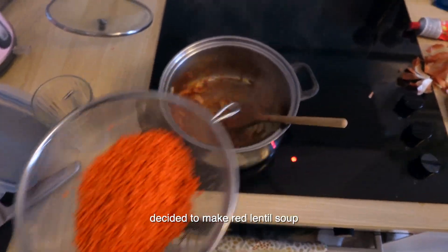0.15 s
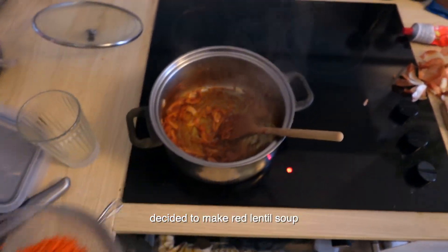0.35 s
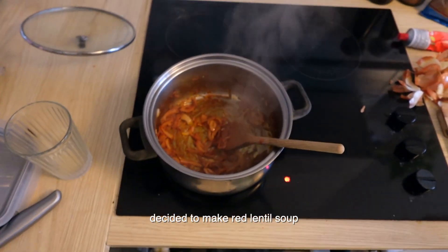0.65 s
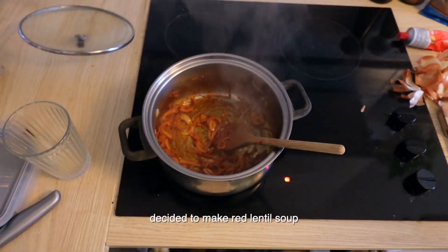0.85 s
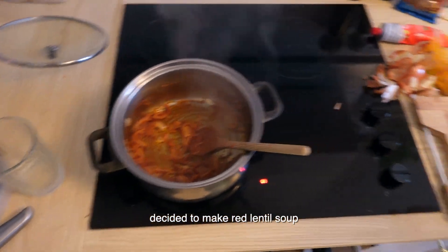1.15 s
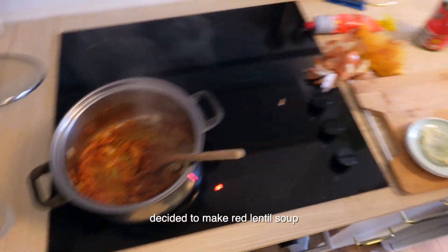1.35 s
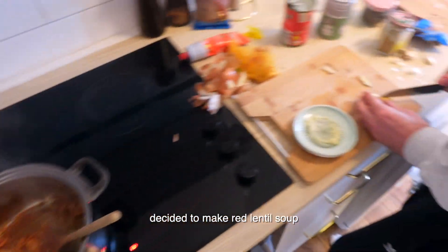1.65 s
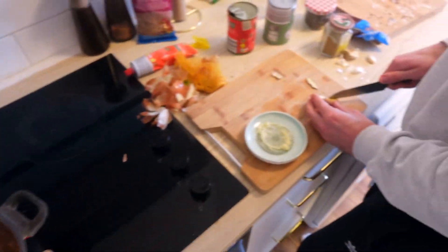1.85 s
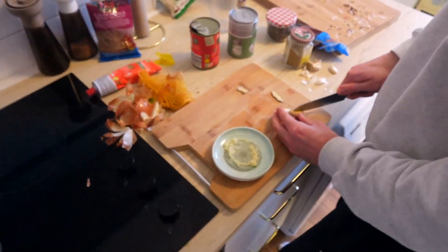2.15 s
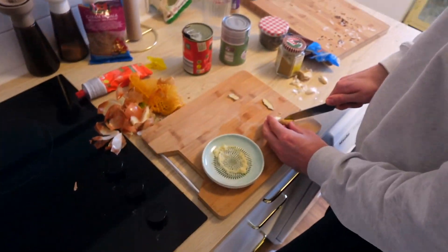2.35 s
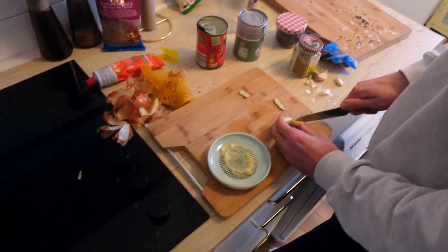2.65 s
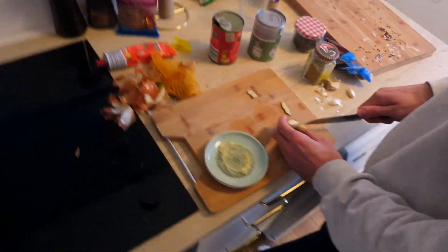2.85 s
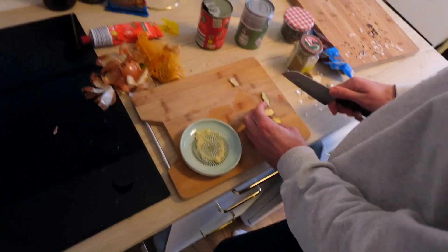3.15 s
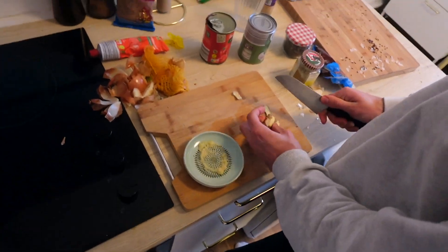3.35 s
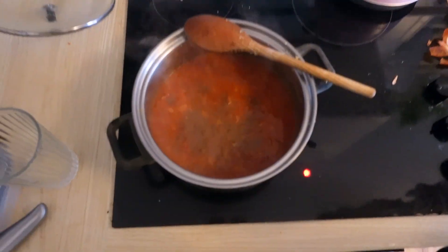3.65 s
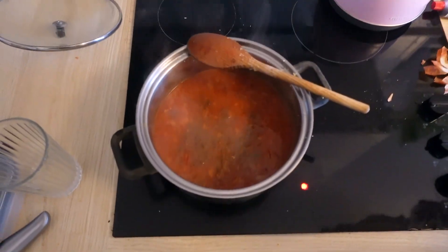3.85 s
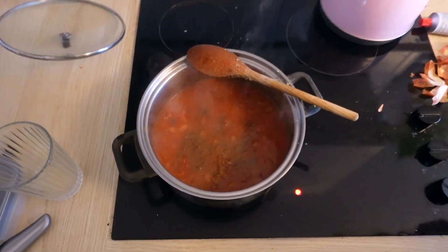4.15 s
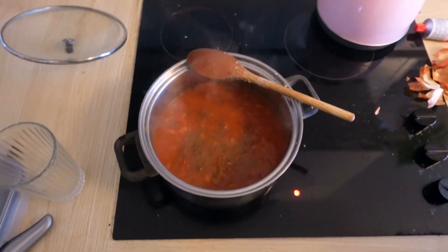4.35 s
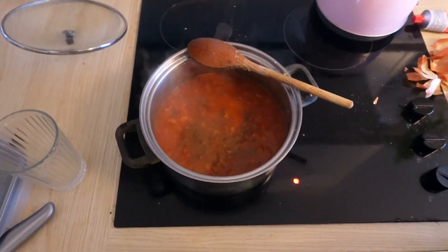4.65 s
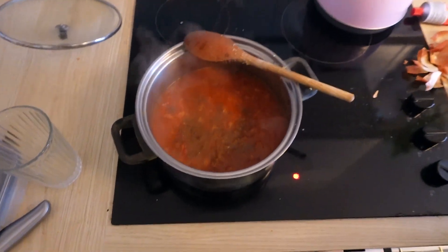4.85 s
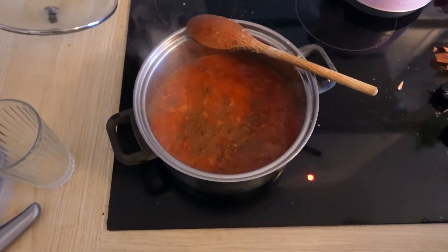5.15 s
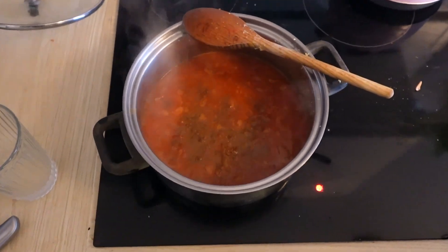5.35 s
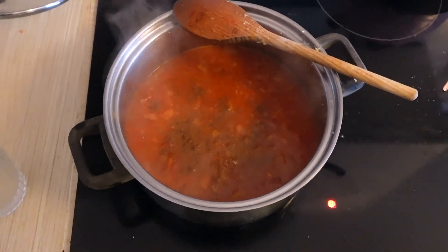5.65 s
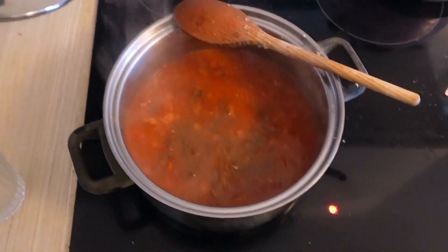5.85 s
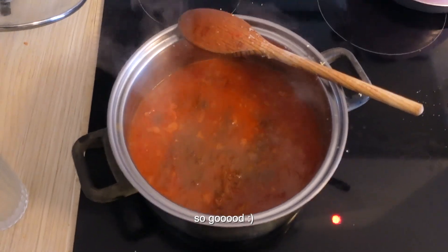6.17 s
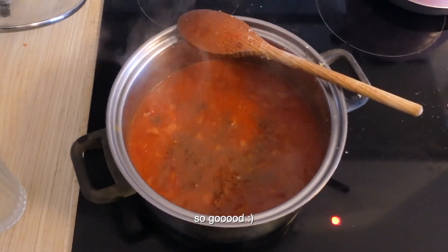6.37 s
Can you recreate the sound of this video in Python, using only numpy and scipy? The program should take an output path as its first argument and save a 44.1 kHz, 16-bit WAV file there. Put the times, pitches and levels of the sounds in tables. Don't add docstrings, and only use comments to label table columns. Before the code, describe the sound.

Bright sizzling in a hot pot, lentils rustle and rattle down with a hard metal knock, knife ticks, then thick soup bubbling and spluttering.

```python
import sys
import numpy as np
from scipy import signal
from scipy.fft import rfft, irfft, next_fast_len
from scipy.io import wavfile
from scipy.ndimage import uniform_filter1d

SR = 44100
rng = np.random.default_rng(int(sys.argv[2]) if len(sys.argv) > 2 else 0)


def log_audio(samples):
    frames = np.atleast_2d(samples).T
    limited = np.clip(frames, -1, 1)
    pcm = np.round(limited * 32767).astype(np.int16)
    wavfile.write(sys.argv[1], SR, pcm)


def boost(x):
    u = np.asarray(x, float) / 20
    return 10 ** u


N = 287091

CUT_S, BACK_S, FADE_S = 3.566, 3.632, .26

# (time [s], level [dB])
FRY_NEARNESS = [(0, -36.5), (.4, -37.5), (.75, -35), (1.3, -36.5), (1.5, -37.5), (1.88, -40), (1.97, -36.5),
                (2.06, -37.5), (2.17, -41), (3.56, -41)]
# (frequency [Hz], level [dB per Hz])
FIZZ_TONE = [(1470, -34), (2500, -6.5), (2880, -3.5), (3270, -3.5), (6150, -0.5), (11700, -5.5),
             (15100, -6.5), (16100, -9.5), (16500, -10.5)]
# (frequency [Hz], level [dB per Hz])
FRY_BODY_TONE = [(180, -59.5), (300, -26.5), (637, -10.5), (700, -9.5), (1860, -3), (2120, -3.5),
                 (2880, -5), (5000, -10.5), (6500, -50), (11000, -120)]
# (time [s], peak level [dB], pitch [Hz])
FAT_SPITS = [(0.536, -19, 9600), (.654, -21, 6400), (0.7226, -24, 6500), (0.84, -18, 5440),
             (1.017, -20, 6900), (1.664, -23.5, 8800), (2.1244, -17.5, 7650), (2.348, -27, 11000)]
# (middle time [s], spread [s], level [dB])
FRY_FLARES = [
    (1.2, 0.1, -10),
    (1.98, 0.075, 7.5),
    (3.0, .2, 1),
]
FRY_MEAN_DB = -38.5

# (frequency [Hz], level [dB per Hz])
DRONE_TONE = [(30, -12), (90, -46), (150, -48.5), (200, -33.5), (320, -21.5), (450, -18), (520, -23.5),
              (620, -16.5), (700, -9), (900, -22), (1170, -35), (2000, -76)]
# (before the scene changes [dB], after it [dB])
DRONE_LEVELS = (-59.5, -53.5)
# (pitch [Hz], level after the change [dB], wander [Hz], level before it [dB relative], flutter [dB])
HOB_HUM = [(375, -54.5, 2.2, -13, 1.8), (198, -77.5, 30, 2, 3), (102, -90, 11, -1.1, 7),
           (777, -65.5, 12.2, -0.5, 5)]

# (time [s], peak level [dB], pitch [Hz], 60 dB decay [s])
KNIFE_TICKS = [(.9762, -23.5, 4800, 0.015), (1.7593, -18, 5000, 0.0073), (1.7594, -20, 2800, 0.0038),
               (1.921, -25, 4000, .005), (1.976, -31, 2860, 0.019), (2.0987, -33, 2400, 0.011),
               (2.1243, -20, 4100, 0.0079), (2.1243, -28, 1880, 0.016), (2.1345, -20, 2340, 0.019),
               (2.1805, -32, 2360, 0.011), (2.1915, -28.5, 2430, 0.013), (2.1916, -28, 4000, .006),
               (2.8312, -33, 2370, 0.031), (3.1366, -34.5, 2220, 0.023), (3.3148, -19.5, 2100, 0.014),
               (3.3768, -27.5, 2190, 0.023), (3.4196, -31, 2460, 0.012), (3.4516, -38, 2150, .013)]
# (time [s], peak level [dB], pitch [Hz], 60 dB decay [s])
BOARD_BUMPS = [(.009, -49, 194, 0.27), (.02, -49.5, 114.5, 0.6), (.337, -49.5, 331, 0.18),
               (.337, -46, 560, 0.05), (1.758, -45, 412, 0.039), (2.124, -26.5, 770, 0.017),
               (2.124, -32, 1210, 0.013), (2.127, -35.5, 490, 0.046), (2.805, -44, 620, 0.13),
               (2.829, -48.5, 340, 0.13), (3.028, -41, 446, 0.045), (3.136, -45, 325, 0.045),
               (3.14, -43.5, 504, 0.054)]
# (middle time [s], spread [s], level [dB])
BLADE_SCRAPES = [
    (3.05, 0.055, -44),
    (3.185, .04, -44.5),
    (3.455, 0.036, -41.5),
    (3.531, 0.062, -64),
]

# (time [s], level [dB])
SIEVE_RUSTLE = [(.3, -47), (.5, -39.5), (.72, -34), (.88, -36), (1.1, -37.5), (1.28, -43), (1.45, -39),
                (1.6, -85)]
# (frequency [Hz], width [Hz], level [dB])
MESH_WIRES = [(4030, 430, -2), (5000, 560, 2.5), (6520, 540, 5.5), (7100, 300, -6.5), (7640, 1200, -6)]
# (time [s], peak level [dB])
RIM_KNOCKS = [
    (1.033, -9.5),
    (1.0349, -8),
    (1.037, -19),
]
# (frequency [Hz], level [dB], 60 dB decay [s])
RIM_MODES = [(1500, 3, 0.011), (2100, 9, 0.0072), (2417, 14, 0.015), (3200, 17.5, 0.0096),
             (4200, 7.5, .008), (9700, -16, .003)]
# (frequency [Hz], level [dB per Hz])
LENTIL_TONE = [(290, -54.5), (500, -29), (860, -17), (1260, -3), (1440, -5.5), (2350, 0.5), (2890, -9.5),
               (3250, -2), (4300, -10), (5050, -13.5), (5500, -36), (7000, -53), (9100, -54.5),
               (15400, -100)]
# (attack [s], hold [s], level [dB], fall [dB per s])
HEAP_SLIDE = (.004, .075, -12.5, 140)
# (attack [s], hold [s], level [dB], fall [dB per s])
WORKTOP_BOOM = (0.0169, 0.0264, -33, 100)
SLIDE_S = 1.034

# (time [s], peak level [dB], pitch [Hz], 60 dB decay [s])
CRUMBS = [(1.7625, -30, 4000, .04), (1.923, -27, 14500, .01), (1.931, -30, 8500, .01),
          (2.203, -36, 2400, .01), (2.366, -30, 6000, .012), (2.385, -33, 12500, .02),
          (2.737, -34, 2300, .012), (2.833, -36, 1600, .015), (3.065, -35, 2800, .015),
          (3.205, -36, 2300, .012), (3.413, -35, 2200, .015), (3.47, -36, 2400, .015),
          (.312, -27, 8740, .01), (1.21, -26, 5660, .01)]
# (time [s], peak level [dB], pitch [Hz], 60 dB decay [s])
JETS = [(3.8704, -30, 10800, .03), (3.896, -23, 8500, .04), (3.99, -32, 10000, .04),
        (3.9958, -28, 7660, .04), (4.2875, -30, 11000, .03), (4.3271, -33, 9000, .03),
        (4.352, -29, 11000, .03), (4.5106, -33, 6790, .04), (4.6039, -40, 7900, .03),
        (4.6255, -25, 11000, .03), (4.6494, -31, 7820, .03), (4.7785, -36, 11000, .04),
        (4.9884, -28, 9000, .02), (5.0074, -25, 9000, .03), (5.3158, -33, 11000, .04),
        (5.4415, -31, 9000, .04), (5.4674, -27, 7500, .04), (5.5423, -27, 7500, .04),
        (5.6845, -19, 12000, .02), (5.7814, -29, 9500, .03), (5.8174, -21, 7500, .03),
        (5.8885, -27, 13400, .03), (5.9904, -25, 9500, .03), (6.0457, -27, 10000, .03),
        (6.1065, -32, 8000, .03), (6.136, -32, 7000, .04), (6.2194, -29, 8000, .02),
        (6.2484, -27, 10000, .02), (6.3244, -17, 4700, .06), (6.3644, -31, 11000, .02),
        (6.4438, -32, 8000, .04)]
# (time [s], peak level [dB], pitch [Hz], 60 dB decay [s])
CLEAR_BUBBLES = [(3.8444, -30, 3550, .03), (3.9264, -26, 2620, .03), (3.9444, -26, 3410, .03),
                 (4.0068, -24, 4100, .03), (4.0194, -28, 1500, .03), (4.3316, -29, 2530, .02),
                 (4.3644, -24, 4220, .02), (4.3974, -27, 2690, .03), (4.4364, -24, 4390, .02),
                 (4.4847, -27, 2440, .02), (4.5114, -29, 4300, .03), (4.8105, -31, 2500, .03),
                 (4.8844, -28, 1590, .02), (4.9544, -28, 2190, .02), (5.0444, -27, 2180, .03),
                 (5.2774, -27, 1500, .03), (5.4674, -23, 2030, .03), (5.5423, -18, 2000, .03),
                 (5.5744, -19, 2200, .04), (5.5914, -24, 2600, .04), (5.6114, -19, 2200, .03),
                 (5.7024, -21, 1560, .04), (5.74, -27, 1300, .04), (5.8444, -27, 1600, .03),
                 (5.8885, -21, 1820, .03), (5.9914, -26, 1550, .03), (6.1065, -24, 2680, .02),
                 (6.1494, -27, 3640, .02), (6.2214, -28, 800, .03), (6.2344, -22, 3400, .02),
                 (6.3294, -22, 2100, .03), (6.4094, -32, 1860, .03), (6.4594, -28, 2150, .03)]
# (frequency [Hz], width [Hz], level [dB])
STEAM_WHISTLES = [(4120, 90, 0), (6000, 160, -2)]
# (middle time [s], spread [s], level [dB])
WHISTLE_MOMENT = (2.0, .1, -49)

# (time [s], level [dB])
BOIL_VIGOUR = [(3.63, -69), (3.78, -47.5), (3.95, -33.5), (4.11, -44.5), (4.25, -38.5), (4.45, -33.5),
               (4.6, -44), (4.74, -47), (4.95, -37), (5.07, -33.5), (5.12, -45), (5.37, -36.5),
               (5.6, -32.5), (5.66, -32), (5.87, -37), (6.3, -33), (6.51, -36.5)]
SIMMER_MEAN_DB = -34.5
# (frequency [Hz], level [dB per Hz])
POT_TONE = [(260, -65), (450, -27), (553, -20), (790, -13.5), (1420, 0), (1610, 1.5), (2610, 1.5),
            (2860, -4), (3210, -1.5), (7000, -5), (9100, -28), (15400, -120)]
# (frequency [Hz], width [Hz], level [dB])
POT_AIR_MODES = [(812, 116, 0), (1340, 150, 1.5), (1560, 16, -3.5), (1670, 16, 2.5), (2040, 13, -5),
                 (2297, 98, 3.5), (3240, 45, -4)]
# (frequency [Hz], level [dB per Hz])
SPRAY_TONE = [(2350, -35.5), (4000, -1.5), (4290, -1.5), (5160, -3), (11000, -3.5), (15100, -8),
              (16000, -19.5), (16500, -26.5)]

# (time [s], peak level [dB], mouth pitch [Hz], spray over the peak [dB])
WET_BURSTS = [(3.642, -47, 5400, -4), (3.701, -44.5, 5640, -19), (3.8782, -21, 4570, -4),
              (3.911, -26, 5340, -1.1), (4.0028, -21, 3600, -6.5), (4.1704, -20.5, 3500, -3),
              (4.329, -34, 3240, -4), (4.355, -26, 2610, -9.5), (4.413, -22.5, 3000, -3.5),
              (4.4325, -27, 4670, -5), (4.447, -26, 5350, 1), (4.628, -28, 2180, 4),
              (4.9912, -23, 3200, -3), (5.0032, -18, 1730, -8), (5.136, -13.5, 1860, -10),
              (5.1903, -26, 2900, -9.5), (5.2467, -26, 7400, 4.5), (5.4539, -21, 3200, -8),
              (5.464, -28, 2320, -2.5), (5.5547, -16, 2680, -8.5), (5.6752, -22.5, 2700, -4),
              (5.694, -15.5, 1560, 1.2), (5.799, -16.5, 5700, -2.5), (5.8126, -14, 1510, -8),
              (5.931, -27, 5970, -0.5), (5.9737, -17.5, 2930, -7), (6.0536, -22, 3050, -7),
              (6.2002, -26, 1490, 0), (6.2303, -17.5, 4340, -4), (6.3174, -16, 1590, -1.5)]
# (time [s], peak level [dB], mouth pitch [Hz])
THICK_PLOPS = [(3.793, -35, 3700), (3.8248, -22.5, 3500), (3.9363, -23, 3400), (4.1513, -27, 2700),
               (4.251, -30.5, 2680), (4.287, -26, 5160), (4.382, -19, 2260), (4.4842, -35, 2120),
               (4.5091, -32, 4360), (4.788, -28.5, 2580), (4.827, -21.5, 3170), (4.849, -13.5, 1760),
               (4.8924, -17, 2100), (4.944, -26.5, 2140), (5.0244, -27, 4030), (5.083, -33, 2450),
               (5.275, -26, 3080), (5.3288, -19, 1270), (5.404, -20, 1600), (5.514, -26.5, 2720),
               (5.5418, -20, 2550), (5.606, -19, 2310), (5.6846, -29, 2340), (5.781, -23, 3320),
               (5.8894, -22, 1800), (6.104, -18, 2800), (6.1357, -27, 2170), (6.163, -25.5, 3680),
               (6.3628, -30, 2250), (6.443, -22, 2340)]
# (time [s], peak level [dB], pitch [Hz], 60 dB decay [s])
SKIN_SNAPS = [(4.7775, -30, 3200, 0.0043), (4.9928, -13, 2900, 0.0043), (5.1368, -6, 2600, 0.0035),
              (5.3853, -32, 2640, 0.014), (5.442, -27.5, 3500, .04), (3.871, -30, 4440, .03),
              (3.895, -25, 5200, 0.045), (3.99, -30, 4200, 0.066), (4.5348, -30, 1660, 0.016),
              (5.6862, -12, 2200, 0.014), (6.0463, -38, 3600, 0.016), (6.2481, -14.5, 2500, 0.018),
              (6.3135, -13.5, 2420, .005), (6.479, -28.5, 2170, 0.019)]

# (delay [s], level [dB], side [0 left, 1 right, rounded down])
FIRST_REFLECTIONS = [
    (.0011, -16.5, 0.99),
    (.0023, -15.5, 0),
]
# (time [s], left minus right [dB])
STEREO_LEAN = [(0, 0.2), (1.2, -1.2), (1.6, .3), (3.5, .8), (3.63, -4.6)]
# (frequency [Hz], likeness [0 to 1])
SIDE_LIKENESS = [(60, .98), (380, 0.77), (1300, 0.97), (2400, 0.98), (4400, 0.88), (8000, 0.99),
                 (15000, 0.6)]
# (time [s], share kept [0 to 1])
FRYING_WIDTH = [(1.03, 0.22), (1.035, 1), (1.3, 0.9), (1.4, 0.1), (1.92, 0.22), (1.95, 1)]


def rms_one(x):
    return x / np.sqrt(np.mean(x ** 2) + 1e-20)


def high_pass(x, hz, order):
    return signal.sosfilt(signal.butter(order, hz, "high", fs=SR, output="sos"), x)


def in_time(curve):
    s, value = np.transpose(curve)
    return np.interp(np.arange(N) / SR, s, value)


def at_hz(points, hz):
    point_hz, value = np.transpose(points)
    return np.interp(np.log(hz), np.log(point_hz), value)


def bell(s, spread_s):
    return np.exp(-((np.arange(N) / SR - s) / spread_s) ** 2)


def swell(s, attack_s, hold_s, db, fall_db_per_s):
    t = np.arange(N) / SR - s
    fall_s = np.maximum(t - attack_s - hold_s, 0)
    return np.clip(t / attack_s, 0, 1) * boost(db - fall_db_per_s * fall_s)


def drift(rate):
    r = np.exp(-80 * np.pi * rate / SR)
    noise = rng.standard_normal(N // 40 + 2002)
    slow = signal.lfilter([1], [1, -2 * r, r * r], noise)[2000:]
    return np.interp(np.arange(N) / 40, np.arange(len(slow)), rms_one(slow))


def resonate(x, hz, width_hz):
    r = np.exp(-np.pi * width_hz / SR)
    poles = [1, -2 * r * np.cos(2 * np.pi * hz / SR), r * r]
    return signal.lfilter(np.array([1, 0, -1]) * (1 - r * r) / 2, poles, x)


def modes(x, table):
    return sum((-1) ** k * boost(db) * resonate(x, hz, width_hz) for k, (hz, width_hz, db) in enumerate(table))


def colour(x, spectrum, wide=1.0):
    size = next_fast_len(N + 4096)
    hz = np.maximum(np.arange(size // 2 + 1) * SR / size, 10)
    fold = irfft(at_hz(spectrum, hz) * np.log(10) / 20, size)
    fold[1:size // 2] *= 2
    fold[size // 2 + 1:] = 0
    alike = 1 - np.clip(wide * (1 - at_hz(SIDE_LIKENESS, hz)), 0, 1)
    mid, side = rfft(x, size) * np.exp(rfft(fold)) * np.sqrt([1 + alike, 1 - alike])
    return rms_one(irfft([mid + side, mid - side], size)[:, :N])


def grains(per_s, spread_db):
    sizes = boost(spread_db * np.minimum(rng.exponential(1, N), 5))
    born = rng.random(N) < per_s / SR
    return sizes * born * rng.standard_normal((2, N))


def struck(rows, ragged, rise_s, size=SR // 5):
    out = np.zeros(N + SR)
    noise = rng.standard_normal((len(rows), size))
    for (s, db, hz, t60), hiss in zip(rows, noise):
        t = np.arange(min(size, round(SR * (t60 + .01)))) / SR
        edge = rms_one(resonate(hiss[:len(t)], hz, hz * 0.39))
        ring = np.sin(2 * np.pi * hz * t) + ragged * edge
        loudness = boost(db - 60 * t / max(t60, .003)) * np.tanh(t / rise_s)
        out[round(s * SR):][:len(t)] += loudness * ring
    return out[:N]


def frying():
    fizz_db = in_time(FRY_NEARNESS)
    swing_db = fizz_db - FRY_MEAN_DB
    body_db = -47 + 0.49 * swing_db + sum(db * bell(s, spread_s) for s, spread_s, db in FRY_FLARES)
    top_db = -40 + 1.3 * swing_db
    fizz = colour(grains(20000, spread_db=0.9), FIZZ_TONE)
    top = high_pass(fizz, 8500, order=3)
    body = colour(grains(12000, spread_db=-2.0), FRY_BODY_TONE)
    spits = struck([(s, db - 6.5, hz, .01) for s, db, hz in FAT_SPITS], ragged=2.8, rise_s=0.0011)
    fizz_layer = boost(fizz_db - .5) * (fizz - top) * 1.246
    top_layer = boost(top_db + 1.14) * rms_one(top)
    return fizz_layer + top_layer + boost(body_db - 0.44) * body + spits


def kitchen_air():
    t = np.arange(N) / SR
    before = t < CUT_S
    fade = np.clip((t - BACK_S) / FADE_S, 0, 1) ** 3
    before_db, after_db = DRONE_LEVELS
    level = np.where(before, boost(before_db), boost(after_db) * (0.89 * fade + 0.12))
    air = level * colour(rng.standard_normal((2, N)), DRONE_TONE, wide=0.3)
    for hz, db, wander_hz, change_db, flutter_db in HOB_HUM:
        line = np.sin(2 * np.pi * np.cumsum(hz + wander_hz * 0.1 * drift(3.66)) / SR)
        air = air + boost(db + flutter_db * drift(8)) * np.where(before, boost(change_db), fade) * line
    return air


def knife():
    crackle = boost(1.5 * drift(40)) * grains(3000, spread_db=1.9)[0]
    hollow = rms_one(modes(crackle, [(2240, 280, -3), (2600, 500, -10)]))
    scrape = sum(boost(db) * bell(s, spread_s) for s, spread_s, db in BLADE_SCRAPES) * hollow
    ticks = high_pass(struck(KNIFE_TICKS, ragged=0.61, rise_s=0.00045), 900, order=2)
    return ticks * boost(4.0) + struck(BOARD_BUMPS, ragged=1.1, rise_s=0.0015) + scrape


def lentils():
    rustle = sum(modes(boost(2.5 * drift(30)) * grains(3000, spread_db=1.9)[0], [wire]) for wire in MESH_WIRES)
    rim = [(s, db + mode_db - 5.5, hz, t60) for s, db in RIM_KNOCKS for hz, mode_db, t60 in RIM_MODES]
    knock = struck(rim, ragged=0.41, rise_s=0.0004)
    rattle = colour(grains(12000, spread_db=0.3), LENTIL_TONE, wide=2.5)
    boom_tone = [(60, -29.5), (110, -9), (200, -1.5), (300, -5.0), (800, 1.5), (1100, -20)]   # (Hz, dB per Hz)
    boom = colour(rng.standard_normal((2, N)), boom_tone, wide=0.08)
    falling = swell(SLIDE_S, *HEAP_SLIDE) * rattle + swell(SLIDE_S, *WORKTOP_BOOM) * boom
    return falling + knock + boost(in_time(SIEVE_RUSTLE)) * rms_one(rustle)


def droplets():
    def ring(rows, trim_db, ragged, rise_s):
        trimmed = [(s, db + trim_db, hz, t60) for s, db, hz, t60 in rows]
        return struck(trimmed, ragged, rise_s, size=2500)

    crumbs = ring(CRUMBS, -3.0, ragged=1.2, rise_s=.0005)
    jets = ring(JETS, -14.5, ragged=2.5, rise_s=.0008)
    bubbles = ring(CLEAR_BUBBLES, -6.5, ragged=.6, rise_s=.0007)
    s, spread_s, db = WHISTLE_MOMENT
    whistle = boost(db) * bell(s, spread_s) * rms_one(modes(rng.standard_normal(N), STEAM_WHISTLES))
    return jets + bubbles + crumbs + whistle


def simmer():
    murmur_db = in_time(BOIL_VIGOUR)
    crackle_db = -48.5 + 0.58 * (murmur_db - SIMMER_MEAN_DB)
    small = grains(5000 * boost(4.5 * drift(15)), spread_db=2.0)
    dealt = rng.integers(0, 12, N)
    blips = 0
    for k, hz in enumerate(np.geomspace(650, 6000, 12)):
        blips = blips + resonate(small * (dealt == k) + 1e-18, hz, 0.22 * hz) / np.sqrt(hz)
    murmur = colour(blips + 2.0 * modes(blips, POT_AIR_MODES), POT_TONE, wide=0.49)
    crackle = colour(grains(12000 * boost(5.1 * drift(33)), spread_db=-2.4), SPRAY_TONE, wide=4.6)
    return boost(murmur_db - 6.0) * murmur + boost(crackle_db) * crackle


def bubble_list():
    chance = rng.uniform(.7, 1.4, (len(WET_BURSTS), 2))
    refills = [(s + .028 * a, db - 13.5, 2380 * b) for (s, db, *_), (a, b) in zip(WET_BURSTS, chance)]
    rows = [(*row, 0.083 * 2 ** (-0.016 * row[-1])) for row in WET_BURSTS]
    rows += [(*row, -18.5, 0.058) for row in THICK_PLOPS + refills]
    return [(s, db, hz, spray_db, t60 * 2 ** (-(db + 22) / 15.5)) for s, db, hz, spray_db, t60 in rows]


def bubble_bursts():
    rows = bubble_list()
    mouth = struck([(s, db - 8.0, hz, 0.23 * t60) for s, db, hz, _, t60 in rows], ragged=1.0, rise_s=0.0014)
    gulps = [(s, db - 15 - 0.5 * np.log2(hz / 2000), 830, 0.037) for s, db, hz, *_ in rows]
    mouth += struck(gulps, ragged=0.77, rise_s=0.0052)

    t = np.arange(SR // 8) / SR
    splutter, spray_power = np.zeros((2, N + SR)), np.zeros(N + SR)
    froth = np.pad(grains(6000, spread_db=2.5), ((0, 0), (0, SR)))
    power = 0
    for s, db, hz, spray_db, t60 in rows:
        at = slice(round(s * SR), round(s * SR) + len(t))
        decay = 60 * t / max(t60, .01)
        fall = np.tanh(t / 0.0015) * boost(db - decay)
        splutter[:, at] += fall * (froth[:, at] + 3 * resonate(froth[:, at], hz, .3 * hz))
        spray_power[at] += (np.tanh(t / 0.0026) * fall * boost(spray_db - decay / 4)) ** 2
        power += np.sum(fall ** 2) / N
    splutter, spray_power = splutter[:, :N], spray_power[:N]

    in_pot = colour(splutter + 1.25 * modes(splutter, POT_AIR_MODES), POT_TONE, wide=0.97)
    pot = np.sqrt(power) * boost(-6.0) * in_pot
    drops = np.sqrt(spray_power) * grains(12000, spread_db=0.4)
    spray = np.sqrt(np.mean(spray_power)) * colour(drops, SPRAY_TONE, wide=8.3)
    tears = [(s, db, hz, 0.0013) for s, db, hz, *_ in WET_BURSTS + THICK_PLOPS]
    clicks = struck(SKIN_SNAPS + tears, ragged=0.53, rise_s=.0001)
    return high_pass(mouth + clicks, 450, order=3) + pot + spray


def first_reflections(x):
    out = np.zeros((2, N))
    for lag_s, db, side in FIRST_REFLECTIONS:
        lag = round(lag_s * SR)
        out[int(side), lag:] += boost(db) * x[:-lag]
    return out


def kitchen_echo(x):
    t60_s, wall_cut_hz = 0.86, 42000
    size = next_fast_len(N + SR)
    hz = np.arange(size // 2 + 1) * SR / size
    lags = rng.uniform(.012, .04, (2, 8, 1))
    loss = boost(-60 * lags / t60_s * (4.0 + (hz / wall_cut_hz) ** 2))
    loop = loss * np.exp(-2j * np.pi * hz * lags)
    return irfft(rfft(x, size) * (loop / (1 - loop)).sum(axis=1), size)[:, :N]


def scene():
    t = np.arange(N) / SR
    before = t < CUT_S
    steady = np.where(before, frying(), simmer())
    blows = np.where(before, lentils() + knife(), bubble_bursts())
    centre = blows.mean(axis=0)
    echo = kitchen_echo(centre) * np.where(before, boost(-18.0), boost(-12.0))
    echo = high_pass(echo, 400, order=2)
    lean = boost(in_time(STEREO_LEAN) * [[.5], [-.5]])
    near = high_pass(blows + first_reflections(centre) + echo + steady, 170, order=3) * lean
    small = droplets()
    near = near + (small + 1.5 * first_reflections(small)) * lean
    gap = (t >= CUT_S) & (t < BACK_S)
    return (near + kitchen_air()) * np.where(gap, boost(-20), 1)


def narrowed(side):
    def low_pass(hz):
        return signal.sosfiltfilt(signal.butter(8, hz, fs=SR, output="sos"), side)

    bass, middle, treble = low_pass(1500), low_pass(5700), low_pass(9100)
    frying_side = bass + in_time(FRYING_WIDTH) * (middle - bass)
    top = side - treble
    bursting = uniform_filter1d(top ** 2, size=256) > 2 * uniform_filter1d(top ** 2, size=4096)
    soup_side = treble + 0.33 * uniform_filter1d(bursting * 1., size=128) * top
    return np.where(np.arange(N) < CUT_S * SR, frying_side, soup_side)


def top_cut(x):
    return signal.sosfilt(signal.butter(12, 17010, fs=SR, output="sos"), x)


def record(dry):
    limit_db, release_db_per_s = -4, 200
    over_db = np.maximum(20 * np.log10(np.abs(dry).max(axis=0) + 1e-9) - limit_db, 0)
    slope = release_db_per_s * np.arange(N) / SR
    held_db = np.maximum.accumulate(over_db + slope) - slope
    x = dry * boost(-signal.lfilter([.015], [1, -.985], held_db))
    side = narrowed(x[0] - x[1]) / 2
    x = x.mean(axis=0) + side * [[1], [-1]]
    x = 0.87 * np.tanh(x / 0.85)
    x = signal.sosfilt(signal.ellip(8, .3, 26, 15900, fs=SR, output="sos"), x)
    return top_cut(high_pass(x, 92, order=4))


dry = scene()
out = record(dry)
log_audio(out)
```